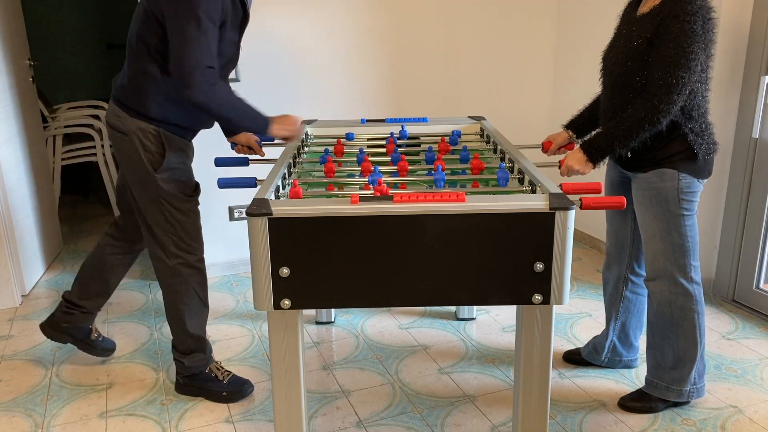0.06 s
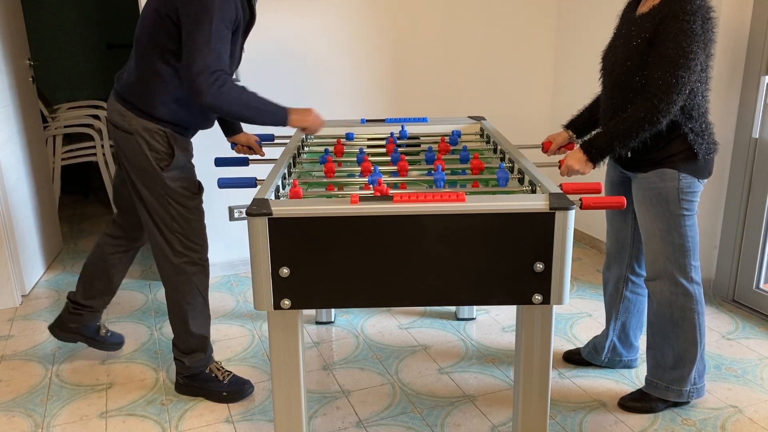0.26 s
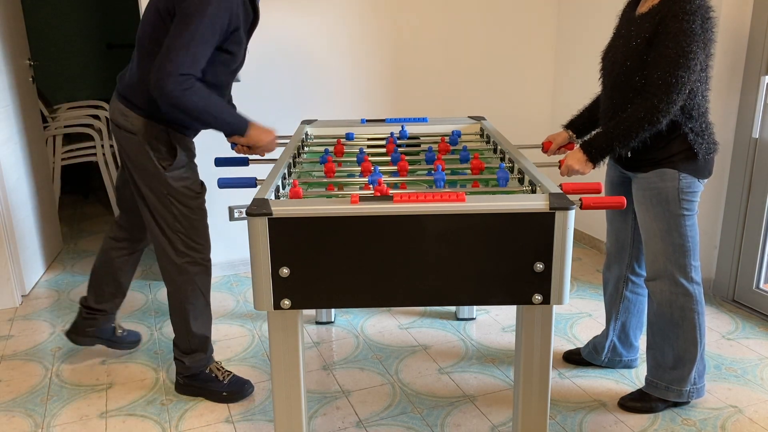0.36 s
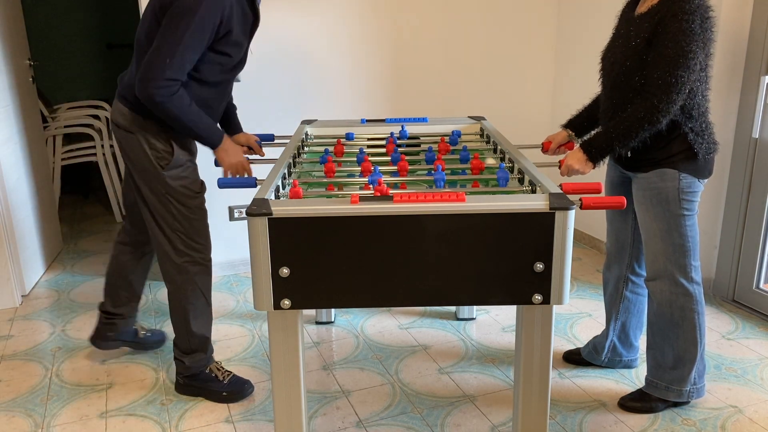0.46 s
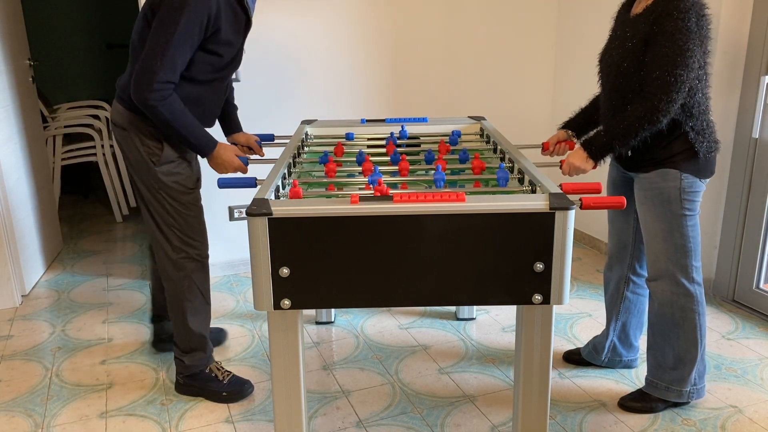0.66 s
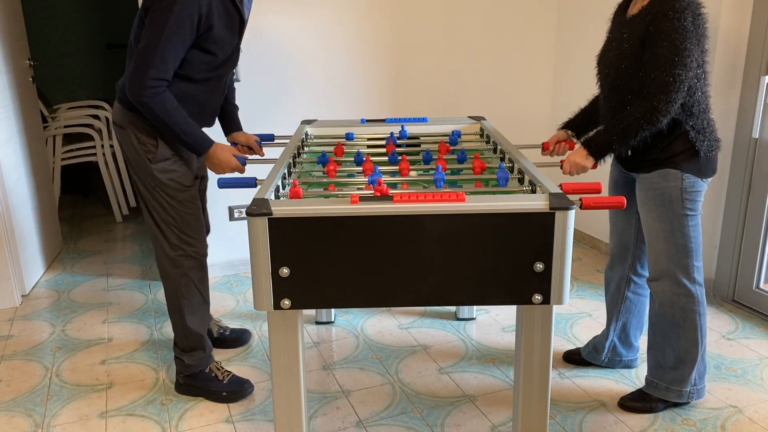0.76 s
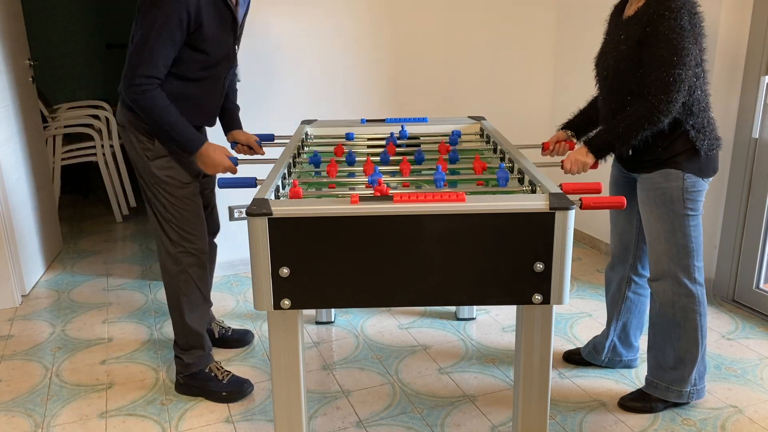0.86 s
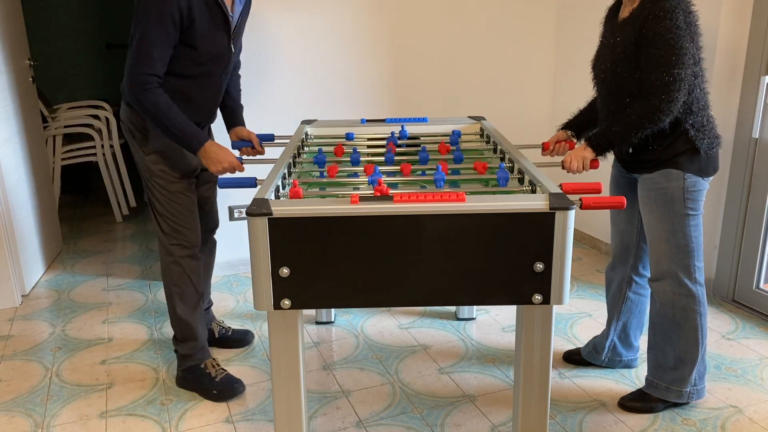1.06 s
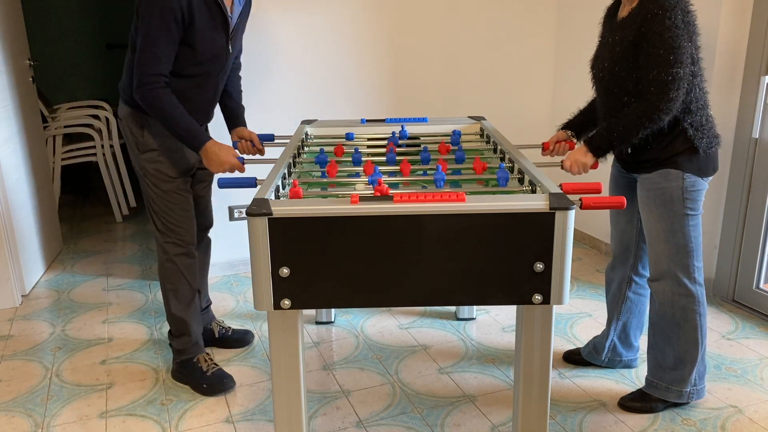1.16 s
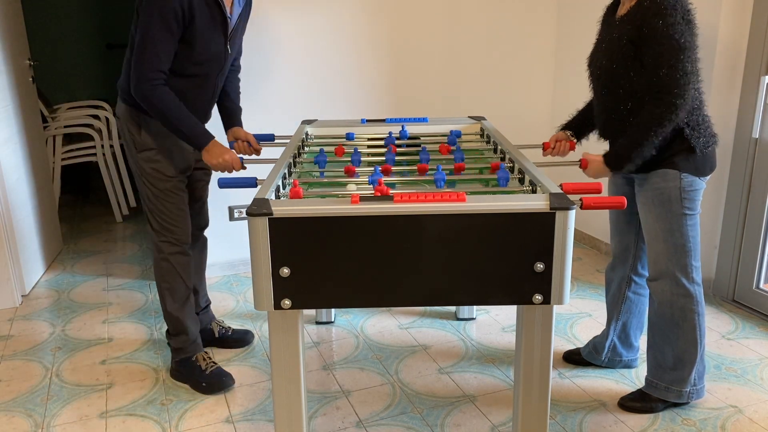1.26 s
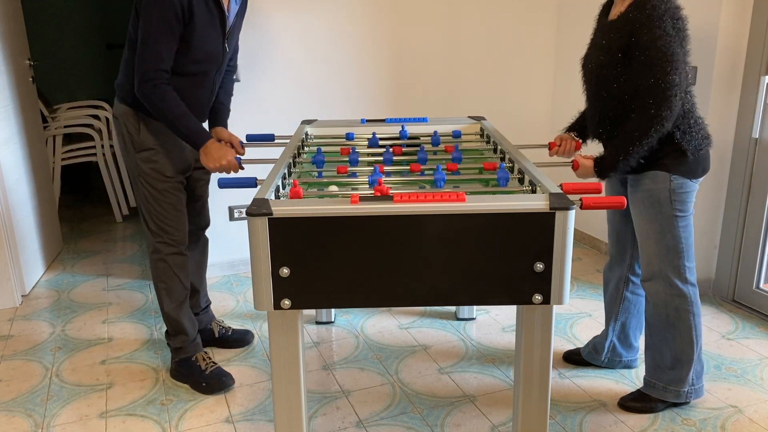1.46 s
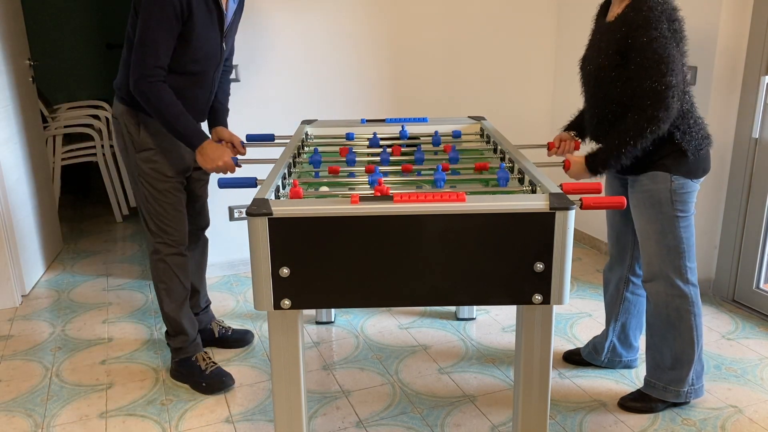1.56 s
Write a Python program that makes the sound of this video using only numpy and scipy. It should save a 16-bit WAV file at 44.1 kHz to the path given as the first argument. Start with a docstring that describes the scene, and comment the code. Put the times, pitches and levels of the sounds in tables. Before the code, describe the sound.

Table football: a hard ball knocks against figures and walls in an echoing room.

```python
"""Table football in a tiled, echoing room, on a closely spaced pair of microphones.
First the hard ball is kicked and knocks against figures and walls, setting the cabinet booming;
between the knocks a steel rod clicks and a player's step thuds softly on the floor. From about 0.9 s
the ball rattles along the pitch while a rod slides. Near 1.25 s a rod snaps and bumps against its
stop, two more steps fall, and one dull knock ends the play. Faint room tone lies under it all."""
import sys
import numpy as np
from scipy import signal
from scipy.fft import rfft, irfft, next_fast_len
from scipy.io import wavfile

SR = 44100
rng = np.random.default_rng(int(sys.argv[2]) if len(sys.argv) > 2 else 0)


def unload_audio(sound):
    """Save the sound as a 16-bit wav file, at the path given as the first command line argument."""
    columns = np.transpose(np.atleast_2d(sound))
    # keep every value between -1 and 1, then stretch to whole-number steps
    steps = np.round(np.clip(columns, -1, 1) * 32767)
    wavfile.write(sys.argv[1], SR, steps.astype(np.int16))


N = 70560
TIME = np.arange(N) / SR

# tone of the ball's contact: frequency_hz, level_db
BALL_TONE = [(25, -36), (40, -25), (70, -8), (110, -6.5), (160, 3), (215, 0), (280, 5), (500, 8), (800, 7),
             (1300, 10), (2400, 9), (3600, 5.5), (5200, -4.5), (7200, -6), (8500, -12.5), (11000, -2.5),
             (15500, -13)]
# knocks on the table: start_s, level_db, cutoff_hz, cabinet_db, crack_db, part_hz, part_db
KNOCKS = [(0.2168, -6, 4600, -47, 3, 2650, 5), (0.2201, -1.5, 4400, 0.5, -2, 3920, 7),
          (0.4249, -4.5, 1940, -9, -1.5, 1920, 6), (0.6907, -0.5, 4140, -3.5, -5.5, 2300, 1),
          (0.8448, -13, 3460, -6, 1.5, 2700, 12), (0.8497, -6.5, 2900, -3.5, -0.5, 1180, -0.5),
          (0.9337, -13, 2780, -6, -2.5, 2726, 11.5), (1.515, -20.5, 930, -4, -11, 337, 10.5)]
def ball_knocks(gain_db=18.5, width_hz=200):
    """The ball strikes a figure or a wall, each with its own resonance; softer contacts are duller."""
    out = 0
    for start_s, level_db, cutoff_hz, cabinet_db, crack_db, part_hz, part_db in KNOCKS:
        def tone_db(hz):
            resonance_db = part_db / (1 + (2 * (hz - part_hz) / width_hz) ** 2)
            return gain_db + at_hz(BALL_TONE, hz) + softness(hz, cutoff_hz) + resonance_db
        knock = coloured(blow(crack_db), tone_db)
        boom = from_db(cabinet_db) * cabinet(cutoff_hz)
        out += from_db(level_db) * starting(knock + boom, start_s)
    return out


# modes of the table's cabinet: pitch_hz, level_db, t60_s
CABINET_MODES = [(62.3, -30.5, 4.8), (153.26, -2.5, 0.61), (179.6, -7, 0.19), (270, -4, 0.29),
                 (331, -1.5, 0.15), (407, -12.5, 0.43), (508.3, -10.5, 0.44), (579, -7, 0.38),
                 (667.4, -8, 0.41), (783, -13.5, 0.46), (966, -8.5, 0.35), (1109, -4, 0.26),
                 (1191, -1.5, 0.2), (1870, -8, 0.21), (2226, -6.5, 0.28), (2635, -8, 0.27),
                 (2660, -8, 0.61), (3365, -6.5, .45)]
def cabinet(cutoff_hz, gain_db=-18, rise_s=0.0041):
    """The cabinet booms in its strong modes; a soft contact barely stirs the high ones."""
    out = 0
    for i, (pitch_hz, level_db, t60_s) in enumerate(CABINET_MODES):
        gain = from_db(gain_db + level_db + softness(pitch_hz, cutoff_hz))
        out += (-1) ** i * gain * ring(pitch_hz, t60_s)
    return out * rise(rise_s)


# the ball's run along the pitch: time_s, level_db
ROLL_LEVEL = [(.86, 2), (.95, -1), (1.0, 4.5), (1.07, -6), (1.11, -21), (1.25, -7), (1.45, -20), (1.6, -32)]
def ball_roll(taps_per_s=230, spread_db=3, tap_db=-8, cutoff_hz=1250, cabinet_db=-25):
    """Many small uneven contacts of the rolling ball keep the cabinet's low modes sounding."""
    taps = (rng.random(N) < taps_per_s / SR) * rng.choice([-1, 1], N)
    taps = taps * from_db(rng.normal(0, spread_db, N)) * in_time(ROLL_LEVEL)
    tap = coloured(blow(crack_db=4), lambda hz: tap_db + at_hz(BALL_TONE, hz) + softness(hz, cutoff_hz))
    rumble = from_db(cabinet_db) * cabinet(cutoff_hz=200)
    return signal.fftconvolve(taps[None], tap + rumble, axes=1)[:, :N]


# modes of a struck rod: pitch_hz, level_db, t60_s
ROD_MODES = [(4540, -27.5, 0.044), (6950, -22, .025), (7500, -21, 0.012)]
# strength of that ping, for each rod: level_db
PING_DB = {"ringing": 7.5, "snapping": -16}
# tone of the click, for each of two rods: frequency_hz, level_db
CLICK_TONE = {"ringing": [(100, -26), (400, 7), (750, 1), (1400, 10.5), (2000, -3), (2900, 6), (3800, -7.5),
              (4450, 3), (4900, -1.5), (5600, -3.5), (6100, -9.5), (6700, 0), (7350, 0), (8000, -5),
              (9000, -11.5), (12000, -6.5), (14000, -22), (15500, -15)], "snapping": [(100, -37),
              (400, -24), (1300, -12), (2200, -3), (2800, 0), (3800, -1.5), (4400, -10.5), (5000, -3),
              (5900, 3.5), (7000, -1), (8400, -9), (9100, 1.5), (10000, -2), (11200, -5.5), (12100, 4),
              (13400, -7), (15500, -6)]}
# clicks at the rods: start_s, level_db, crack_db, rod
CLICKS = [(0.4112, -9.5, 2, "ringing"), (0.4139, -13, -10, "ringing"), (1.23, -12, -8.5, "snapping")]
def rod_clicks(gain_db=17.5):
    """A steel rod makes a bright contact and rings with a short ping."""
    ping = sum(from_db(level_db) * ring(pitch_hz, t60_s) for pitch_hz, level_db, t60_s in ROD_MODES)
    out = 0
    for start_s, level_db, crack_db, rod in CLICKS:
        click = coloured(blow(crack_db), lambda hz: gain_db + at_hz(CLICK_TONE[rod], hz))
        out += from_db(level_db) * starting(click + from_db(PING_DB[rod]) * ping, start_s)
    return out


# tone of the rubber stop: frequency_hz, level_db
RUBBER_TONE = [(40, -16), (70, 1), (140, 12), (220, 3.5), (400, 6), (800, 6.5), (1300, 5.5), (2200, -16),
               (4000, -13), (8000, -54), (16000, -59)]
# bumps at the end of a rod's travel: start_s, level_db, cabinet_db
BUMPS = [(1.235, -14, 1), (1.2686, -11, 11), (1.2881, -19, 7)]
def rod_bumps(gain_db=20.5, rubber_rise_s=0.0055, grip_t60_s=0.63):
    """A rod sinks into its rubber stop, rebounds and shakes the cabinet, which the player's grip damps."""
    out = 0
    for start_s, level_db, cabinet_db in BUMPS:
        thud = coloured(blow(crack_db=-7), lambda hz: gain_db + at_hz(RUBBER_TONE, hz))
        boom = from_db(cabinet_db) * decay(grip_t60_s) * cabinet(cutoff_hz=190)
        out += from_db(level_db) * starting(rise(rubber_rise_s) * (thud + boom), start_s)
    return out


# a player's steps beside the table: start_s, level_db, pitch_hz, t60_s
STEPS = [(0.525, -32, 115, 0.41), (1.273, -27.5, 113, 0.25), (1.372, -30, 61.4, 0.52)]
def steps(rise_s=0.034):
    """Soft footfalls swell into a low boom at the floor's resonance."""
    out = 0
    for start_s, level_db, pitch_hz, t60_s in STEPS:
        boom = rise(rise_s) * ring(pitch_hz, t60_s)
        out += from_db(level_db) * starting(boom[None], start_s)
    return out


# tone of the sliding steel: frequency_hz, level_db
SLIDE_TONE = [(1000, -19), (4000, 1.5), (7000, 2), (8500, -4), (11500, 4), (13500, -14), (15500, -8)]
# one stroke of the rod: time_s, level_db
SLIDE_LEVEL = [(.85, -100), (.95, -65), (1.05, -62), (1.14, -60), (1.2, -62.5), (1.3, -100)]
def rod_slide():
    """A steel rod hisses faintly as it slides in its bearings."""
    return in_time(SLIDE_LEVEL) * steady_noise(SLIDE_TONE)


# background all around the microphones: frequency_hz, level_db
ROOM_TONE = [(25, -34), (60, -9.5), (95, -15.5), (180, -5), (220, -20), (280, -7), (450, -15), (780, -19.5),
             (1200, -29), (2500, -39.5), (6000, -48.5), (16000, -58)]
def room_tone(noise_db=-56, hum_db=-61, hum_hz=183):
    """The room's low, even noise, with a faint steady hum."""
    hum = from_db(hum_db) * np.sin(2 * np.pi * hum_hz * TIME)
    return from_db(noise_db) * steady_noise(ROOM_TONE) + hum


# reverberation of the tiled room: band_hz, t60_s
ROOM_DECAY = [(60, 2.3), (150, 1.1), (400, .75), (1000, 0.69), (2000, 0.54), (4000, 0.56), (7500, 0.5),
              (11000, 0.35), (16000, 0.16)]
def room_echo():
    """The echo comes back from all sides and lingers longest in the bass."""
    hz = np.fft.rfftfreq(N, 1 / SR)
    spectrum = rfft(diffuse_noise())
    out = 0
    for band_hz, t60_s in ROOM_DECAY:
        band = at_hz([(f, float(f == band_hz)) for f, _ in ROOM_DECAY], hz)
        out += irfft(spectrum * band, N) * decay(t60_s)
    return out


# likeness of the room's sound at the two microphones: frequency_hz, correlation
MIC_LIKENESS = [(60, .92), (140, 0.82), (250, 0.82), (500, 0.24), (1000, 0.13), (2000, 0.56), (4000, 0.32),
                (8000, 0.65), (12000, 0.76)]
def diffuse_noise():
    """Noise from all directions, partly shared by left and right."""
    alike = at_hz(MIC_LIKENESS, np.fft.rfftfreq(N, 1 / SR))
    mid, side = rfft(rng.standard_normal((2, N)))
    spectrum = np.sqrt(1 + alike) * mid + np.sqrt(1 - alike) * side * [[1], [-1]]
    return irfft(spectrum / np.sqrt(2), N)


def blow(crack_db, attack_db=5):
    """One blow at the microphones: the direct snap, the brief crack of dense panel modes, then the room."""
    snap = rng.standard_normal(N) * decay(t60_s=0.012)
    crack = diffuse_noise() * decay(t60_s=0.071)
    return (from_db(attack_db + crack_db) * (snap + crack) + room_echo()) / np.sqrt(SR / 20)


def steady_noise(tone):
    """Diffuse noise of the given tone, at rms 1."""
    noise = coloured(diffuse_noise(), lambda hz: at_hz(tone, hz))
    return noise / noise.std()


def softness(hz, cutoff_hz):
    """Gain in dB of a contact that loses 12 dB per octave above its cut-off."""
    return -10 * np.log10(1 + (hz / cutoff_hz) ** 4)


def ring(pitch_hz, t60_s):
    """One struck mode: a dying sine."""
    return np.sin(2 * np.pi * pitch_hz * TIME) * decay(t60_s)


def decay(t60_s):
    """Envelope that falls 60 dB in t60_s."""
    return np.exp(-np.log(1000) * TIME / t60_s)


def rise(rise_s):
    """Soft onset with time constant rise_s."""
    return 1 - np.exp(-TIME / rise_s)


def from_db(db):
    """Decibels to gain."""
    return 10 ** (np.asarray(db) / 20)


def at_hz(points, hz):
    """Read a table on a log-frequency axis."""
    frequency_hz, values = np.transpose(points)
    return np.interp(np.log(np.maximum(hz, 1)), np.log(frequency_hz), values)


def in_time(points):
    """Gain along a level curve, silent before it starts."""
    time_s, level_db = np.transpose(points)
    return from_db(np.interp(TIME, time_s, level_db)) * (TIME >= time_s[0])


def starting(x, start_s):
    """Delay a sound to its moment."""
    return np.pad(x, ((0, 0), (int(start_s * SR), 0)))[:, :N]


def coloured(x, db_at):
    """Causal (minimum-phase) filter with the given dB at each frequency."""
    size = next_fast_len(2 * N)
    size += size % 2
    cepstrum = irfft(db_at(np.fft.rfftfreq(size, 1 / SR)) * np.log(10) / 20)
    cepstrum[1:size // 2] *= 2
    cepstrum[size // 2 + 1:] = 0
    return irfft(rfft(x, size) * np.exp(rfft(cepstrum)), size)[..., :N]


# balance across the microphone pair: frequency_hz, left_minus_right_db
MIC_BALANCE = [(100, -1.5), (250, -4), (500, -3), (1000, -1.5), (2000, -0.3), (4000, 2.5), (8000, 1)]
def scene(right_lag_s=0.000036):
    """All sources as they reach two closely spaced microphones, the right one a moment later."""
    mix = ball_knocks() + ball_roll() + rod_clicks() + rod_bumps() + steps() + rod_slide() + room_tone()
    hz = np.fft.rfftfreq(2 * N, 1 / SR)
    balance = from_db(at_hz(MIC_BALANCE, hz) * [[0.5], [-0.5]])
    lag = np.exp(-2j * np.pi * hz * right_lag_s * [[0], [1]])
    return irfft(rfft(mix, 2 * N) * balance * lag)[:, :N]


def record(dry):
    """The microphones lose the deepest bass; the highest peaks are rounded and the top is cut."""
    low_cut_hz, high_cut_hz, ceiling = 38, 15900, 0.9
    x = signal.sosfilt(signal.butter(2, low_cut_hz, "high", fs=SR, output="sos"), dry)
    rounded = x / (1 + (x / ceiling) ** 6) ** (1 / 6)
    return signal.sosfilt(signal.ellip(10, 0.2, 80, high_cut_hz, fs=SR, output="sos"), rounded)


dry = scene()
out = record(dry)
unload_audio(out)
```